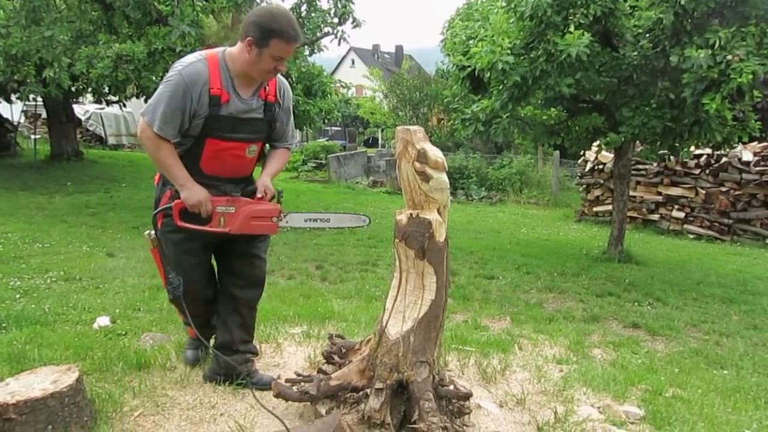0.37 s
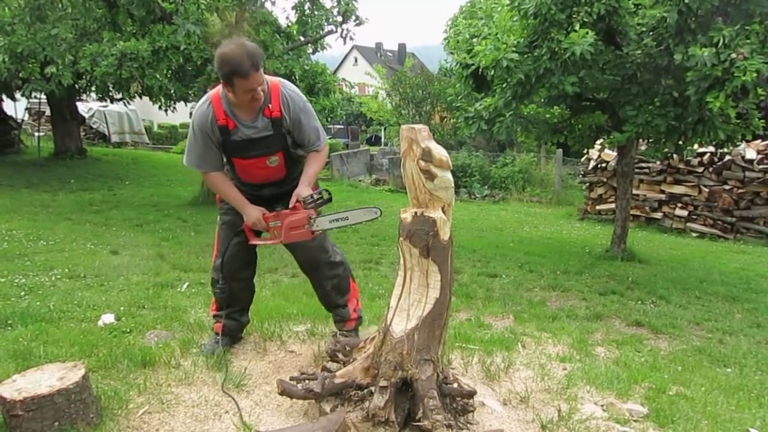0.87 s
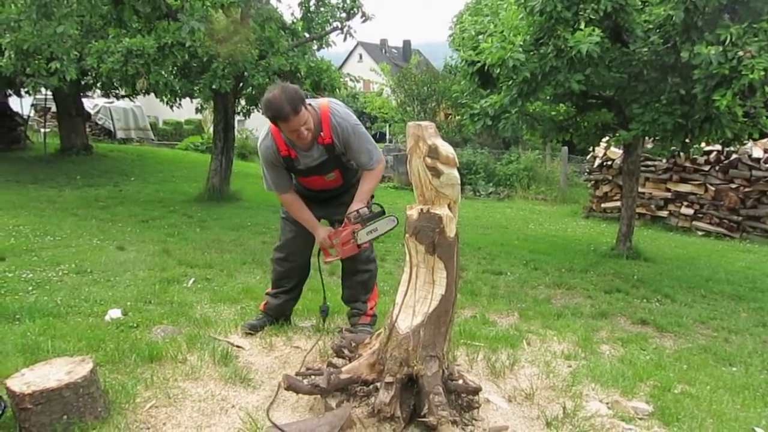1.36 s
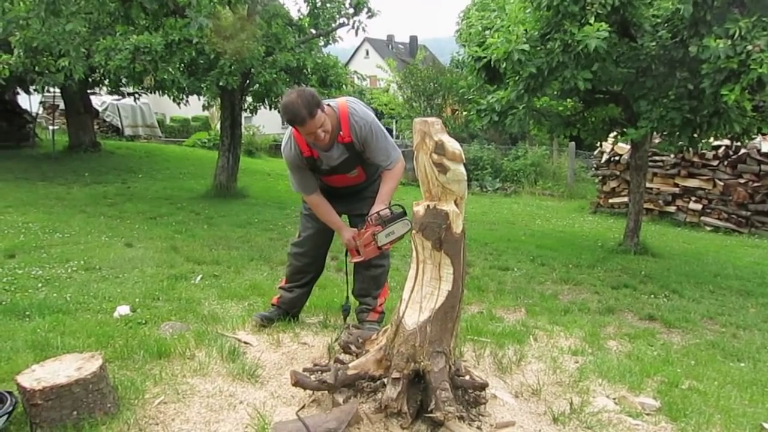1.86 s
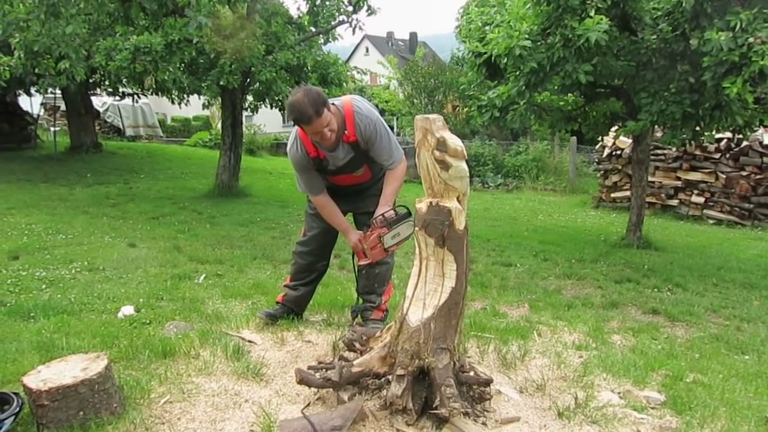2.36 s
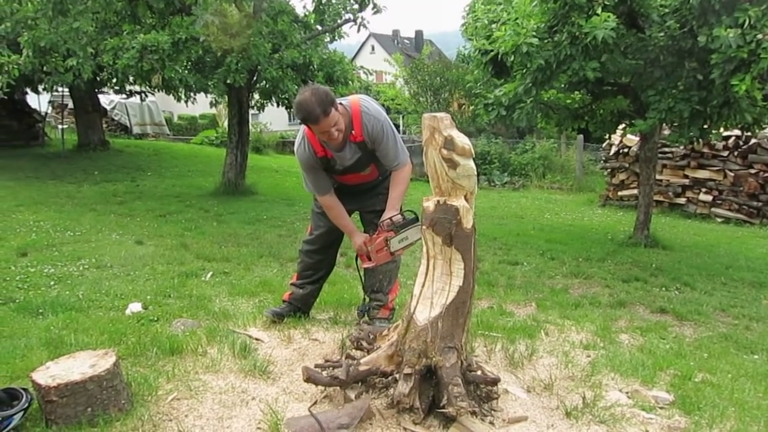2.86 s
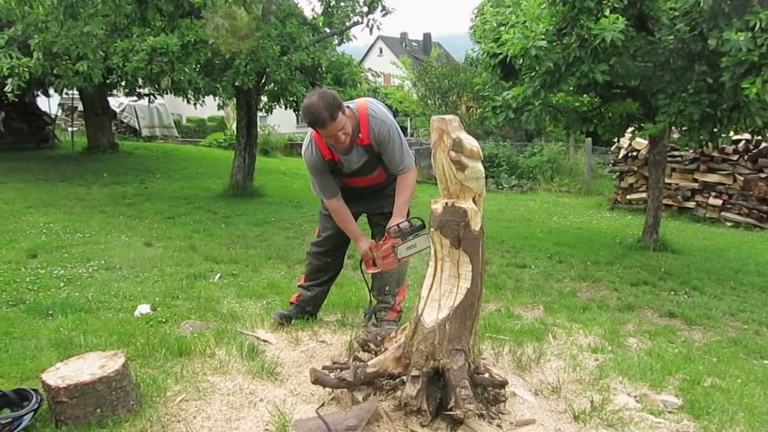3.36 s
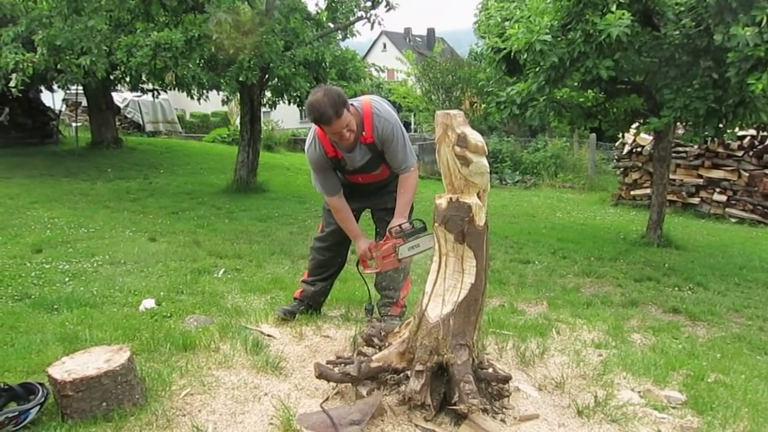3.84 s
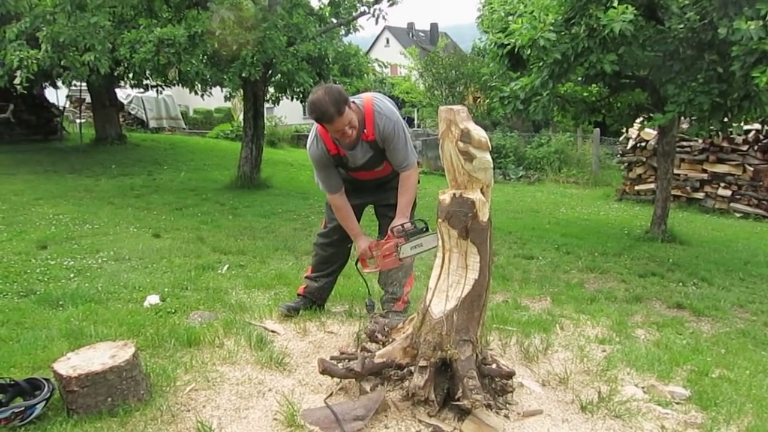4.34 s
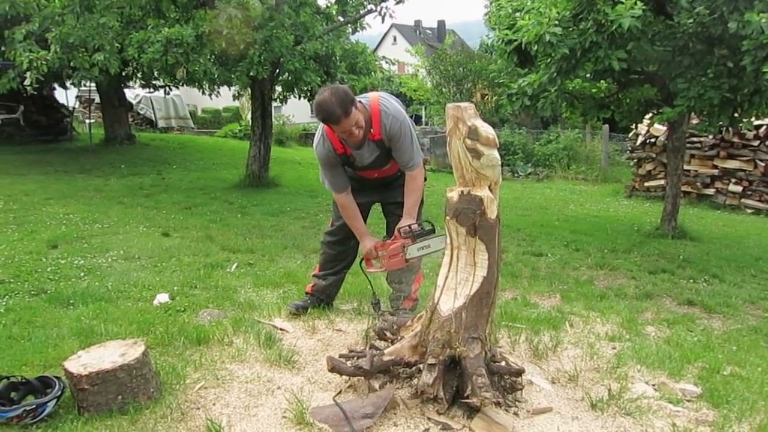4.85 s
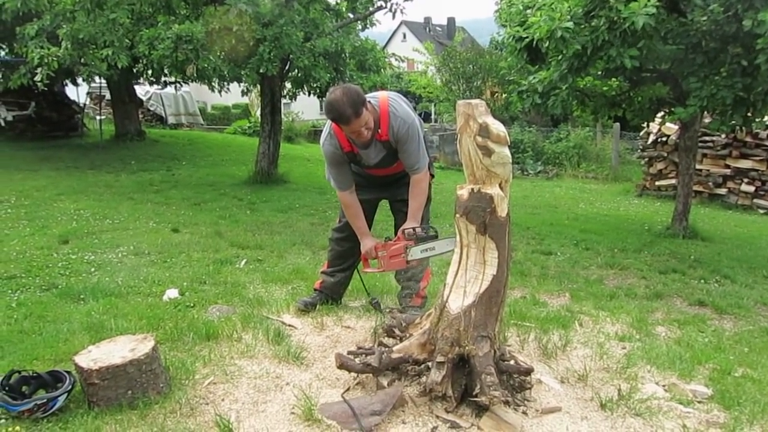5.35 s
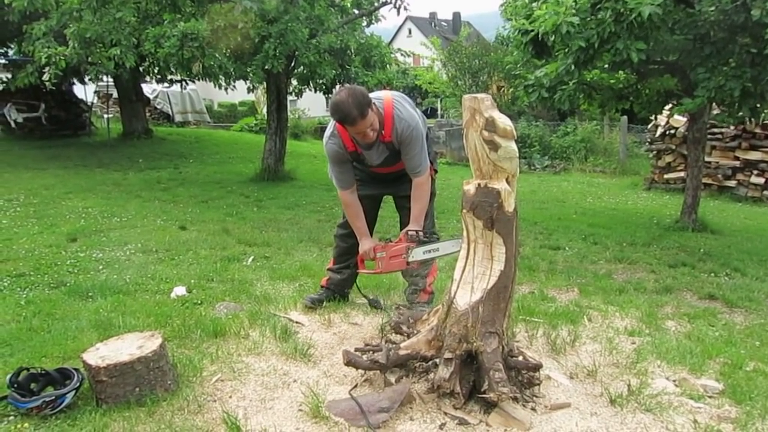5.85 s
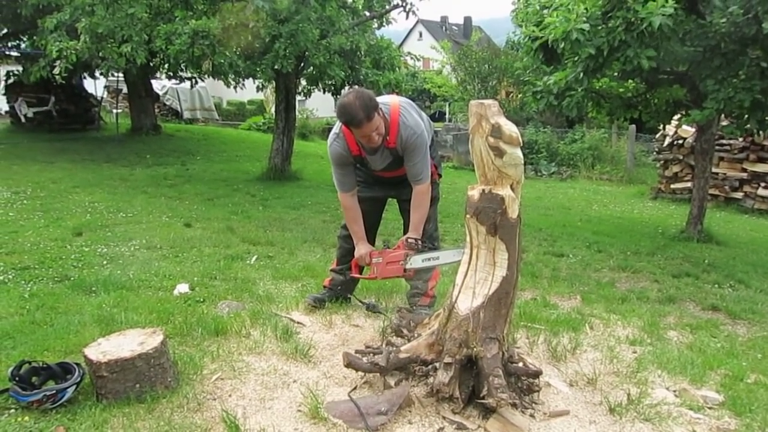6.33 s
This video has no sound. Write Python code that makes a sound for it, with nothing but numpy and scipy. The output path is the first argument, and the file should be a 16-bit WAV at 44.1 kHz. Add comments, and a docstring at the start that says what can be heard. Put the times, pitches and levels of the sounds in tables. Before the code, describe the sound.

A few last clacks of a stopping saw chain, then near silence with small footsteps, rustles and chip snaps over a distant low hum. A hard clattering restart follows, rising quickly into a loud buzzing electric whine with bright chain rattle, gritty rasp and hollow woody boom. The pitch barely drifts while overtones and ringing bites swell and fade. Open garden, single mono microphone, no noticeable echo, slightly dull top.

```python
"""In a quiet garden an electric chainsaw coasts to a stop; the carver steps round the log and starts it again.
Drive links tick over sprocket and bar as puffs of noise and tones at multiples of the link rate.
Cutters rasp and ring in the wood, and shell and log boom in broad bands of noise.
A gear tone too high for the recorder's sampling folds back as a thin whistle that sinks as the chain speeds up.
Underfoot, cloth and grass rustle, boots scuff and chips snap; distant hum and leaves lie behind it all."""
import sys
import numpy as np
from scipy import signal
from scipy.io import wavfile
from scipy.ndimage import uniform_filter1d

SR = 44100
rng = np.random.default_rng(int(sys.argv[2]) if len(sys.argv) > 2 else 0)


def amplitude_ratio(level_db):
    """Convert a level in decibels to the matching linear amplitude (field) ratio."""
    exponent = np.asarray(level_db, float) / 20
    return 10 ** exponent


def output_pcm(signal):
    """Save a mono or channel-first signal as 16-bit PCM at the path in sys.argv[1].

    Samples are clipped to [-1, 1] before scaling.
    """
    pcm = np.clip(np.atleast_2d(signal).T, -1, 1) * 32767
    wavfile.write(sys.argv[1], SR, np.round(pcm).astype(np.int16))


N = 284886
T = np.arange(N) / SR

# chain speed: (time [s], drive links per second [1/s])
SPEED = [(1.4375, 420), (1.6, 555), (1.7, 629), (1.82, 688), (1.94, 722), (2.05, 740), (2.16, 744.5),
         (2.24, 741.5), (2.42, 727.5), (2.66, 714.5), (2.9, 705), (3.14, 700), (3.62, 692.7), (3.88, 692.6),
         (3.98, 702), (4.1, 702), (4.25, 696.5), (4.7, 694.8), (4.95, 689.5), (5.06, 697.5), (5.18, 691),
         (5.42, 691.5), (5.54, 695), (5.86, 687.6), (6.07, 683), (6.2, 675), (6.38, 691.5), (6.46, 692)]
# the carver's hands: (time [s], load [dB], depth of the bar in the cut [0-1], share turned away [0-1],
# rasp of the cutters over the load [dB])
SAWING = [(1.4375, -29, .3, 0.3, -1), (1.56, -22.5, 0.8, 0.1, -0.5), (1.7, -20, 0.2, 0.24, -2),
          (1.88, -19.5, 0.27, 0.1, 0), (2.21, -17.5, 0.12, 0, -1.5), (2.27, -18.5, .1, 0.2, -1),
          (2.84, -19.5, 0.26, 0.24, 1), (2.93, -18.5, 0.26, 0.17, 1.5), (3.2, -18.5, 0.18, .1, 1),
          (3.52, -18, 0.38, .1, 0.5), (3.78, -19.5, 0.62, 0.17, 0.5), (4.2, -19, 0.5, 0.2, 0),
          (4.84, -17.5, 0.5, 0.25, -1), (5.07, -18.5, 0.56, 0.3, 2), (5.16, -19, .7, 0.2, 0),
          (5.27, -19, 0.65, .2, 0.5), (5.35, -21.5, 0.67, 0.6, 0), (5.63, -20, 0.97, 0.87, -0.5),
          (5.93, -18, 0.77, .6, 0), (6.02, -19.5, 0.9, 0.52, -0.5), (6.46, -17, 0.9, .53, -.6)]


def evened(x):
    """Scales to rms 1."""
    return x / np.sqrt(np.mean(x ** 2) + 1e-20)


def curves(rows):
    """Columns of a table along time, and a gate that is open over its span."""
    s, *columns = np.transpose(rows)
    return [np.interp(T, s, c) for c in columns] + [(T >= s[0]) & (T <= s[-1])]


def wander(seconds):
    """Slow chance, rms 1: noise smoothed twice over the given time."""
    size = max(int(seconds * SR / 32), 2)  # drawn at every 32nd sample
    coarse = rng.standard_normal(N // 32 + 2)
    coarse = evened(uniform_filter1d(uniform_filter1d(coarse, size), size))
    return np.interp(np.arange(N) / 32, np.arange(len(coarse)), coarse)


def coloured(x, points, patchy_db):
    """Gives x a spectrum with drifting patches, rms 1."""
    hz, _, z = signal.stft(x, SR, nperseg=1024, noverlap=768)
    patches = rng.standard_normal(z.shape)
    patches = uniform_filter1d(patches, size=10, axis=0)
    patches = evened(uniform_filter1d(patches, size=12, axis=1))
    f, db = np.transpose(points)
    shape_db = np.interp(np.log(hz + 1), np.log(f), db, left=db[0], right=-90)
    z = z * amplitude_ratio(shape_db[:, None] + patchy_db * patches)
    return evened(signal.istft(z, SR, nperseg=1024, noverlap=768)[1][:N])


def resonate(x, hz, width_hz):
    """A resonance of gain 1 that follows the curve hz."""
    turn = np.exp(2j * np.pi * np.cumsum(hz * np.ones(len(x))) / SR)
    r = np.exp(-np.pi * width_hz / SR)
    return 2 * (turn * signal.lfilter([1 - r], [1, -r], x / turn)).real


def resonate_twice(x, hz, width_hz):
    """Two equal resonances in a row, for steeper flanks."""
    return resonate(resonate(x, hz, width_hz), hz, width_hz)


def puffs(turns, spread_db, tail, bed, jitter):
    """Noise that jumps at each passing link, unevenly in size and time, and fades over a share of the gap."""
    turns = np.maximum(turns + jitter * wander(.004), 0)
    sizes = amplitude_ratio(spread_db * np.minimum(rng.exponential(1, N), 4))
    envelope = bed + sizes[turns.astype(int)] * np.exp(-(turns % 1) / tail)
    return evened(envelope * rng.standard_normal(N))


def swell(start, end, db):
    """A level that rises and sinks again between two moments."""
    return amplitude_ratio(db) * abs(np.sin(np.pi * np.clip((T - start) / (end - start), 0, 1))) ** 0.34


def with_depth(shallow_db, deep_db):
    """A level that follows the depth of the bar in the cut."""
    return shallow_db + (deep_db - shallow_db) * curves(SAWING)[1]


def ticks(rows, modes):
    """Each tick mixes a short dull ring of noise-driven modes with a bright snap of differentiated noise."""
    out, t = np.zeros(N), np.arange(3000) / SR
    for s, db, snap in rows:
        hiss = rng.standard_normal(len(t))
        ring = sum(evened(resonate_twice(hiss, hz, 730)) * amplitude_ratio(mode_db - 60 * t / max(t60, .004))
                   for hz, mode_db, t60 in modes)
        crack = np.gradient(hiss) * np.exp(-t / 0.00093)
        snap = np.clip(snap, 0, 1)
        out[round(s * SR):][:len(t)] += amplitude_ratio(db) * ((1 - snap) * ring + snap * crack)
    return out


def slack_chain():
    """Slow links clack one by one, each a puff of noise."""
    # the slack chain running out, then taking up speed: (time [s], links per second [1/s], level [dB])
    runs = [
        [(0, 215, -28), (.04, 194, -29), (.07, 165, -32.5), (.1, 140, -37.5), (.12, 130, -42), (.135, 65, -54)],
        [(1.437, 120, -38.5), (1.46, 82, -22), (1.5, 110, -29.5), (1.58, 140, -23), (1.66, 330, -41),
         (1.78, 600, -49)],
    ]
    # its colour when braked, then when driven: (frequency [Hz], relative level [dB])
    colours = [
        [(40, -48), (220, -22), (340, -9), (520, -14), (800, -9), (1160, -1.5), (1550, -5.5), (1950, -18),
         (2400, -11.5), (2900, -18), (3500, -22), (5000, -19.5), (6200, -22), (9900, -13.5), (11300, -25),
         (12100, -40)],
        [(40, -46), (250, -7), (500, -6), (900, 2), (1400, -4.5), (2000, -8), (2600, -1.5), (3200, -25),
         (5000, -30), (9000, -24), (12000, -29)],
    ]
    out = np.zeros(N)
    for rows, colour in zip(runs, colours):
        hz, db, on = curves(rows)
        clacks = puffs(np.cumsum(hz) / SR, spread_db=1.7, tail=0.2, bed=0.64, jitter=.3)
        out += on * amplitude_ratio(db) * coloured(clacks, colour, 0.86)
    return out


def garden():
    """Distant hum and leaves: a bed of shaped noise."""
    # colour of the garden: (frequency [Hz], relative level [dB])
    colour = [(25, -30), (45, -16), (110, -1.5), (300, -18), (590, -17), (760, -8.5), (1060, -11.5),
              (1450, -18.5), (2200, -19.5), (3000, -30), (10500, -27), (11400, -40), (12000, -60)]
    garden_db = -57.5
    return amplitude_ratio(garden_db + 0.53 * wander(0.16)) * coloured(rng.standard_normal(N), colour, 0.71)


def steps():
    """Crackly rustle of cloth and grass and a low scuff of boots as the carver moves."""
    # the carver shifts his weight: (start [s], hold [s], rustle level [dB], scuff level [dB])
    shifts = [(.11, 0.032, -60, -55), (0.31, 0.089, -59.5, -65), (0.41, .01, -60, -60),
              (.5, .1, -61.5, -58), (.735, 0.061, -63, -60), (.82, 0.16, -64.5, -63),
              (1.085, .04, -62, -61), (1.137, 0.027, -53, -47), (1.149, 0.012, -47.5, -50),
              (1.19, .04, -66, -63), (1.29, 0.026, -69, -61), (1.387, 0.036, -68, -59)]
    # colour of cloth and grass: (frequency [Hz], relative level [dB])
    rustle_colour = [(600, -10), (1000, -12), (1500, -9), (2300, -6.5), (3500, -12), (5500, -11),
                     (9000, -8.5), (10900, -9), (11500, -26)]
    # colour of the boots: (frequency [Hz], relative level [dB])
    scuff_colour = [(60, -15), (150, -4), (280, 3.5), (450, -3), (700, -9), (1000, -9), (2000, -30)]
    rustle_slope, scuff_slope = 402, 260  # dB per s, before and after the hold
    crackle = puffs(400 * T, spread_db=3.0, tail=0.34, bed=0.92, jitter=0.98)
    rustle = coloured(crackle, rustle_colour, 1.4)
    scuff = coloured(rng.standard_normal(N), scuff_colour, 1.6)
    out = np.zeros(N)
    for start, hold, rustle_db, scuff_db in shifts:
        away = np.maximum(np.maximum(start - T, T - start - hold), 0)  # s outside the hold
        out += amplitude_ratio(rustle_db - rustle_slope * away) * rustle
        out += amplitude_ratio(scuff_db - scuff_slope * away) * scuff
    return out


def chain_catches():
    """The slack chain catches, and loose links ring."""
    # catches: (time [s], level [dB], share of bright snap [0-1])
    rows = [(.139, -41, .05), (.148, -41.5, .1), (1.4375, -19, .7), (1.458, -31, .15), (1.478, -17, 0.3),
            (1.49, -27, .05), (1.504, -20.5, .3), (1.534, -29, .5), (1.551, -30, 0.4), (1.601, -19, 0.2)]
    # what a loose link rings with: (frequency [Hz], relative level [dB], t60 [s])
    modes = [(880, 3, .026), (1250, 2, 0.024), (2400, 1, .018)]
    return ticks(rows, modes)


def chip_snaps():
    """Wood chips snap underfoot."""
    # snaps: (time [s], level [dB], share of bright snap [0-1])
    rows = [(.4, -39, 0.1), (.992, -34, 0.8), (1.0765, -35, 1), (1.162, -35, .5)]
    # what a chip rings with: (frequency [Hz], relative level [dB], t60 [s])
    modes = [(500, -4, .03), (1000, 0, .03), (1900, -1, 0.018)]
    return ticks(rows, modes)


def housing():
    """The plastic shell and the log hum along in broad resonances, fuller once the motor has some speed."""
    # boom of the housing: (frequency [Hz], relative level [dB])
    boom = [(500, -43), (700, -3), (800, 6), (870, 11.5), (940, 6.5), (1020, 2), (1300, -9)]
    # low growl: (frequency [Hz], relative level [dB])
    growl = [(25, -18), (60, -33), (200, -2), (330, 7), (450, 9), (600, 18.5), (750, 13), (1000, 13)]
    # upper boom: (frequency [Hz], relative level [dB])
    upper_boom = [(800, -48), (1000, -2), (1200, -1.5), (1450, -13.5), (1900, 2)]
    # (shallow dB, deep dB): deeper in the wood the growl is muffled and the booms grow
    layers = ((-29.5, -24.5), boom), ((-30.5, -40), growl), ((-34, -28.5), upper_boom)
    hz, on = curves(SPEED)
    spun_up_db = -8. * np.clip((620 - hz) / 200, 0, 1)
    out = np.zeros(N)
    for depth_db, colour in layers:
        level = amplitude_ratio(with_depth(*depth_db) + spun_up_db + 1.35 * wander(0.11))
        out += level * coloured(rng.standard_normal(N), colour, 0.22)
    return on * out


def tones():
    """Multiples of the link rate, each wavering on its own, and the folded gear tone."""
    # overtones of the link rate: (multiple [1], steady level [dB])
    overtones = [(.75, -55), (1.25, -63), (1.5, -46), (1.75, -56), (2, -35.5), (2.25, -37.5), (2.5, -52),
                 (3, -38.5), (3.5, -40.5), (4, -51.5), (4.5, -43), (5, -44), (6, -43)]
    # an overtone sings out as the bar turns or presses: (start [s], end [s], multiple [1], level [dB])
    flares = [(1.758, 2.304, 2, -43), (1.908, 2.02, 2.5, -25), (2.06, 2.19, 2.5, -33),
              (1.9, 3.85, .75, -42), (2.106, 3.617, .5, -41.5), (2.25, 2.427, 2.25, -35),
              (2.75, 3.75, 1.25, -37), (2.8, 3.55, 3, -42), (2.82, 3.2, 2, -38), (2.9, 4.2, 1.5, -49),
              (3.15, 3.65, 2.5, -30.5), (3.55, 3.92, 3, -35), (4.027, 4.133, 2.5, -37),
              (4.02, 4.347, 3, -53), (4.138, 5, .5, -50), (4.15, 5.9, 1.25, -50), (4.2, 4.735, 1.5, -37),
              (4.25, 4.5, 4, -38), (4.5, 4.742, 3, -36), (4.612, 5.005, 1.5, -27.5),
              (4.967, 5.35, 1.5, -30.5), (4.995, 5.12, 3, -30), (5.0, 5.14, 4, -31), (5.08, 5.6, 2, -36.5),
              (5.2, 5.306, 6, -21.5), (5.3, 5.9, 3, -37.5), (5.32, 6.343, .5, -40.5),
              (5.596, 5.98, 2, -33.5), (5.7, 6.1, 3.5, -38), (5.85, 6.203, 3, -32),
              (5.86, 6.11, 1.5, -29.5), (6.15, 6.7, 2, -34), (6.198, 6.35, 2.5, -29),
              (6.33, 6.595, 2.5, -25)]
    # the gear whistle comes through: (start [s], end [s], level [dB])
    whistles = [(1.973, 2.39, -30), (2.58, 2.74, -39), (2.917, 3.158, -31), (3.8, 3.92, -37),
                (4.05, 4.52, -35), (4.83, 5.0, -31), (5.876, 6.1, -27), (6.1, 6.26, -35)]
    cutter_db, whistle_db = -53.5, -36.5  # between flares
    gear_multiple, fold_hz = 21.79, 22050
    hz, on = curves(SPEED)
    angle = 2 * np.pi * np.cumsum(uniform_filter1d(hz, size=2000)) / SR  # the motor's mass smooths the speed
    taut = np.clip((hz - 450) / 170, 0, 1)
    slack_db = 0.02 * np.maximum(694 - hz, 0)  # below 694 links per s the tones are weaker
    link_db = with_depth(-23, -32.5) - slack_db  # the wood muffles the link tone
    out = amplitude_ratio(link_db + 0.74 * wander(0.042)) * np.sin(angle + .07 * wander(0.037))
    for multiple, db in [(.5, cutter_db)] + overtones:  # a cutter on every second link
        size = amplitude_ratio(db + 2.4 * wander(0.052) - 3.5 * slack_db)
        size += sum(swell(start, end, flare_db) for start, end, k, flare_db in flares if k == multiple)
        wavering_angle = multiple * (angle + 0.075 * wander(0.019))
        out += size * amplitude_ratio(2.1 * wander(0.084)) * np.sin(wavering_angle)
    whistle = np.sin(2 * np.pi * fold_hz * T - gear_multiple * angle + 0.56 * wander(0.01))
    whistle_size = amplitude_ratio(whistle_db) + sum(swell(*row) for row in whistles)
    whistle *= whistle_size * amplitude_ratio(0.86 * wander(0.023))
    return np.sqrt(2) * on * taut * (out + whistle)  # levels are rms, hence the root of 2


def sawing():
    """Links rattle on the bar, cutters rasp and ring the cut: puffs at the link rate and at half of it."""
    # colour of the rattle: (frequency [Hz], relative level [dB])
    rattle_colour = [(3000, -12.5), (5000, -14), (7000, -12), (9000, 1), (10500, 0.5), (11300, -5.5),
                     (11900, -19), (12300, -45)]
    # colour of the rasp: (frequency [Hz], relative level [dB])
    rasp_colour = [(900, -20.5), (1300, -1.5), (2200, -1), (3000, -6), (3700, -8), (4600, -1), (6000, 0),
                   (8000, 0.5), (11000, -8.5)]
    # colour of the rasp when turned away: (frequency [Hz], relative level [dB])
    turned_colour = [(900, -24.5), (1300, -1), (2200, -3), (3000, -3.5), (3900, -3.5), (4700, -4.5),
                     (6000, -4), (8000, -2.5), (11000, -18)]
    turned_db = 2  # over the rasp that is not turned away
    turns = np.cumsum(curves(SPEED)[0]) / SR
    load_db, _, turned, rasp_db, on = curves(SAWING)
    turned = np.clip(turned, 0, 1)
    shake_db = 0.32 * wander(0.0042) + 0.25 * wander(0.017)  # the chain slaps unevenly
    links = puffs(turns, spread_db=2.6, tail=0.17, bed=0.74, jitter=.2)
    rattle = amplitude_ratio(load_db + shake_db) * coloured(links, rattle_colour, 0.56)
    shavings = puffs(turns / 2, spread_db=1.5, tail=0.12, bed=1.14, jitter=.35)
    rasp = (1 - turned) * coloured(shavings, rasp_colour, 0.63)
    rasp += turned * amplitude_ratio(turned_db) * coloured(shavings, turned_colour, 1.0)
    rasp *= amplitude_ratio(load_db + rasp_db + 1.2 * shake_db)
    return on * (rattle + rasp + bites(turns))


def bites(turns):
    """Each catch swells quickly in the cut, then fades; its resonance sags in pitch all along."""
    # cutters catch and the cut rings: (start [s], length [s], peak level [dB], mid pitch [Hz], roughness [0-1])
    rows = [(1.91, 0.14, -25, 1780, 0.36), (2.053, 0.085, -23, 1840, 0.24), (2.162, 0.1, -21, 1730, 0.54),
            (2.26, 0.16, -21, 1615, 0.3), (2.7, .18, -27.5, 1780, .6), (3.0, 0.19, -29, 1900, .7),
            (3.123, 0.26, -22.5, 1850, 0.9), (3.355, .2, -24, 1880, 0.55), (3.48, 0.2, -23, 1890, 0.46),
            (4.017, 0.13, -16.5, 1790, 0.16), (4.185, 0.32, -22.5, 1790, 0.3),
            (4.45, 0.29, -27, 1630, 0.34), (4.87, 0.24, -26, 1740, 0.07), (4.983, .16, -23.5, 5900, .9),
            (5.167, 0.14, -22.5, 6100, .9), (5.24, 0.082, -22.5, 4300, 0.7), (5.804, 0.58, -27.5, 1900, .4),
            (6.297, .3, -35, 1760, 0.3)]
    bed_db, rest_hz = -43.5, 1780  # between catches
    peak_share, sag = 0.36, 300  # share of the length, Hz per s
    cutters = evened(sum(np.cos(np.pi * k * turns) for k in range(4, 7)))
    grit = rng.standard_normal(N)
    out = amplitude_ratio(bed_db) * evened(resonate_twice(grit, rest_hz, 350))
    for start, length, db, hz, rough in rows:
        span = slice(round(start * SR), round((start + length) * SR))
        t, rough = T[span] - start, np.clip(rough, 0, 1)
        drive = (1 - rough) * 0.06 * cutters[span] + rough * grit[span]
        ring_hz = hz - sag * (t - length / 2)
        width_hz = hz * (0.1 + 0.13 * rough)  # a rough catch rings broader
        shape = amplitude_ratio(db) * np.interp(t / length, [0, peak_share, 1], [0, 1, 0]) ** 0.39
        out[span] += shape * evened(resonate_twice(drive, ring_hz, width_hz))
    return amplitude_ratio(0.8 * wander(0.013)) * out


def scene():
    """All sources, near and distant, at one microphone."""
    quiet = slack_chain() + garden() + steps() + chain_catches() + chip_snaps()
    return (quiet + housing() + tones() + sawing())[None]


def low_pass(x):
    """Removes everything above the highest recorded frequency."""
    return signal.sosfilt(signal.butter(12, 12220, fs=SR, output="sos"), x)


def record(dry):
    """The microphone input rounds off the loudest peaks, then a steep filter limits the band."""
    rounded = np.tanh(0.75 * dry) / 0.74
    band = signal.firwin(1023, 12200, window=("kaiser", 9), fs=SR)[None]  # edge in Hz
    mix = signal.oaconvolve(rounded, band, "same")
    return low_pass(mix)


dry = scene()
out = record(dry)
output_pcm(out)
```